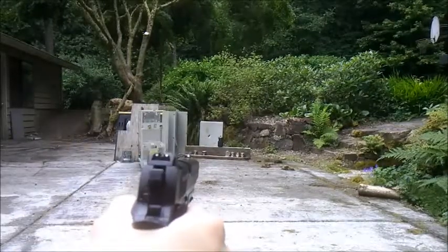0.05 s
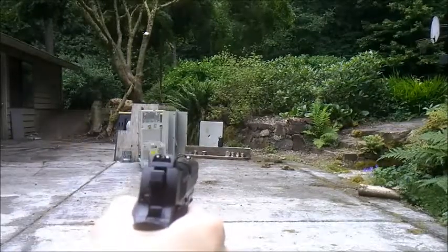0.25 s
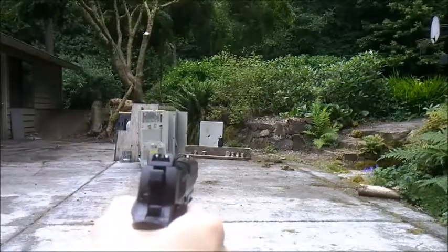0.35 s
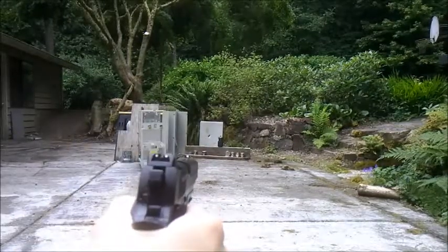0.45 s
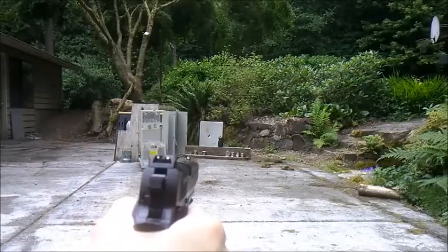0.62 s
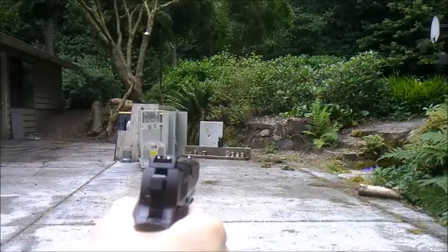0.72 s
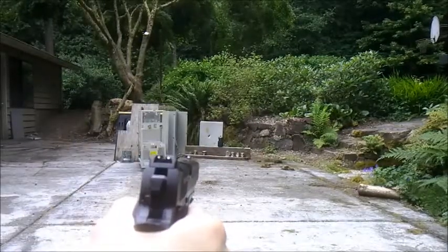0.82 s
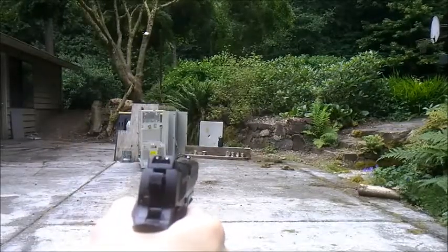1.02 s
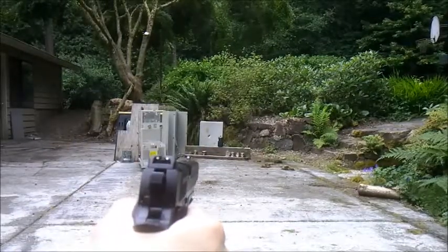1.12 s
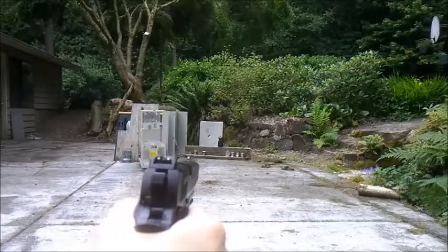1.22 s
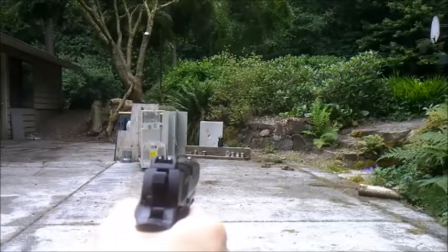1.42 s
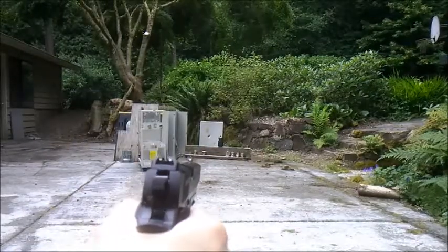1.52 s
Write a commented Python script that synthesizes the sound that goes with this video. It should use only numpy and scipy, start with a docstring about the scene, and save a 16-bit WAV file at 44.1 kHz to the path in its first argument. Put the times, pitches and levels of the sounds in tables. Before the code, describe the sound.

A gas air pistol fires twice about a second apart, close to the microphone, in a concrete yard; each hissy pop is followed by a metallic pellet hit, brief echo and trigger clicks.

```python
"""A gas air pistol fires twice on a concrete yard, over a low wavering hum, soft outdoor noise and faint blips.
Each shot: a hammer tick, a gas blast of decaying noise that overloads the microphones, with a ringing frame,
a recoil thump of low tones, then the pellet cracking on a sheet-metal box and ringing its modes.
The yard answers with dense echoes made from fading noise. After each shot the trigger clicks back:
short noise scrapes with a snap, sent through resonances."""
import sys
import numpy as np
from scipy import signal
from scipy.fft import rfft, irfft
from scipy.io import wavfile
from scipy.ndimage import uniform_filter1d

SR = 44100
rng = np.random.default_rng(int(sys.argv[2]) if len(sys.argv) > 2 else 0)


def put_to_file(sound):
    """Save the sound as 16-bit audio at rate SR, in the file named by the first command-line argument."""
    columns = np.atleast_2d(sound).T  # one column per channel
    safe = np.clip(columns, -1, 1)
    whole_steps = np.round(safe * 32767)
    wavfile.write(sys.argv[1], SR, whole_steps.astype(np.int16))


def amplitude_ratio(level_db):
    """Convert a level in decibels to the matching linear amplitude (field) ratio."""
    exponent = np.asarray(level_db, float) / 20
    return 10 ** exponent


N = 68355  # length in samples


def curve(table, at, col=1, log=False):
    """Draws straight lines between table rows, on a log scale of the first column if asked."""
    rows = np.array(table, float)
    warp = np.log if log else np.asarray
    return np.interp(warp(at), warp(rows[:, 0]), rows[:, col])


def colour(x, table, scale=1):
    """Filters causally with the gain of (Hz, dB) points: a minimum-phase filter built from its log gain."""
    hz = np.maximum(np.arange(2049) * SR / 4096, 1)
    log_gain = scale * curve(table, hz, log=True) * np.log(10) / 20
    cepstrum = irfft(log_gain)
    # folding the second half onto the first makes the filter causal
    cepstrum[1:2048] *= 2
    cepstrum[2049:] = 0
    response = irfft(np.exp(rfft(cepstrum)))[None, :2048]
    return signal.fftconvolve(x, response, axes=1)[:, :x.shape[1]]


def unit(x):
    """Scales a sound to an rms of 1."""
    return x / np.sqrt(np.mean(x ** 2))


def fade(t, t60):
    """Decays exponentially from t = 0, by 60 dB in t60 seconds; silent before."""
    return (t >= 0) * amplitude_ratio(-60 * np.maximum(t, 0) / max(t60, .001))


def band(x, hz, width):
    """Resonates around one frequency; width in Hz."""
    return signal.lfilter(*signal.iirpeak(min(hz, .45 * SR), hz / width, SR), x)


def walk(rate, channels=1, count=N):
    """Wanders slowly at random with spread 1: smoothed noise drawn every 32 samples, faster for a higher rate."""
    smoothing = int(SR / rate / 32) + 1
    points = count // 32 + 2
    draws = rng.standard_normal((channels, N // 32 + 2))
    smooth = unit(uniform_filter1d(uniform_filter1d(draws, smoothing), smoothing))
    return np.array([np.interp(np.arange(count) / 32, np.arange(points), row[:points]) for row in smooth])


def pair(count):
    """Makes left and right noise that is more alike in the bass: the difference is weakened below 1200 Hz."""
    mid, side = rng.standard_normal((2, count))
    side = signal.lfilter(*signal.butter(1, 1200, "high", fs=SR), side) + .15 * side
    return (mid + side * np.array([[1], [-1]]) / 1.2) / np.sqrt(2)


def mode(t, hz, t60, rough, apart):
    """Rings one fading tone whose phase and size wander; apart scatters the phase between the sides."""
    start = 2 * np.pi * rng.random() + apart * rng.standard_normal() * np.array([[0], [1]])
    wander = walk(110, channels=3, count=len(t))
    size = amplitude_ratio(3.2 * rough * wander[0])
    return fade(t, t60) * size * np.sin(2 * np.pi * hz * t + start + rough * wander[1:])


def slide_bursts(t):
    """Gives the swell of the blast, of the slide slamming back and of the slide closing, over a steady 1."""
    # Each row: delay in seconds, extra level in dB, hold in seconds, 60 dB decay in seconds.
    bursts = [(0, 4, .007, 0.01547), (0.0109, 2.5, .002, .03), (.025, -2, .002, .03)]
    swell = 1
    for lag, db, hold, t60 in bursts:
        swell = swell + amplitude_ratio(db) * (t >= lag) * fade(np.maximum(t - lag - hold, 0), t60)
    return swell


def gas_blast(gas, t):
    """Lets the gas noise die at its own speed in each half-octave band, with patchy loudness."""
    # How fast the blast dies. Each row: frequency in Hz, 60 dB decay in seconds.
    decays = [(150, 0.42), (600, 0.19), (2000, 0.15), (4000, .22), (8000, 0.32), (14000, 0.24)]
    hold_s, patchy_db = 0.0043, 3.5
    blast = 0
    for hz in 110 * 2 ** np.arange(0, 7.3, .5):
        t60 = curve(decays, hz, log=True)
        envelope = (t >= 0) * fade(np.maximum(t - hold_s, 0), t60)
        patches = amplitude_ratio(patchy_db * walk(120, count=len(t)))
        blast = blast + band(gas, hz, hz / 3) * envelope * patches
    return blast


def hammer_tick(gas, t):
    """Ticks just ahead of the blast: a short burst of the same noise with a 1 ms rise."""
    lead_s, t60_s = 0.0037, 0.011
    u = t + lead_s
    return gas * fade(u, t60_s) * np.clip(u / .001, 0, 1)


def frame_ring(t):
    """Rings the metal modes of the pistol frame as rough fading tones."""
    # Modes of the frame. Each row: frequency in Hz, level in dB against the shot, 60 dB decay in seconds.
    frame = [(600, -4.5, .08), (1119, -14, 0.18), (1524, -9.5, 0.075), (3030, -5, 0.25), (3180, -2, 0.16),
             (3780, 2.5, .16), (4000, -5.5, 0.15), (4760, -12.5, .2), (5090, -16, .13), (6740, -10, 0.14),
             (7200, -25, 0.17), (9100, -14, 0.48), (11100, -25.5, 0.65)]
    return sum(amplitude_ratio(db) * mode(t, hz, t60, rough=1.1, apart=hz / 3000) for hz, db, t60 in frame)


def recoil_thump(t):
    """Thumps with one low fading tone in each side, rising over 6 ms."""
    # First row left, second right. Each row: frequency in Hz, level in dB against the thump's own,
    # 60 dB decay in seconds, delay in seconds.
    thump = [(56, 0.5, 0.14, 0.0022), (75, -11.5, 0.033, 0.006)]
    sides = []
    for hz, db, t60, lag in thump:
        u = t - lag
        sides.append(amplitude_ratio(db) * fade(u, t60) * np.sin(2 * np.pi * hz * u) * np.clip(u / .006, 0, 1))
    return np.array(sides)


def muzzle_puff(t):
    """Swings the pressure at the muzzle: a quickly dying low tone, starting downward."""
    hz, db = 208, -15.5
    return -amplitude_ratio(db) * fade(t, .02) * np.sin(2 * np.pi * hz * t)


def shot(t, db, tick_db, thump_db):
    """Fires once: returns the gas noise with its tick, the ringing frame, and the low thump with its puff."""
    # Colour of the gas noise. Each row: frequency in Hz, relative level in dB.
    gas_colour = [(59, -31.5), (100, -7), (224, -12), (752, -5.5), (1280, -14), (1550, -5), (2170, -10),
                  (2520, -11.5), (3860, -3.5), (6290, -10), (9210, -16), (16000, -30.5)]
    gas = unit(colour(pair(len(t)), gas_colour))
    level = amplitude_ratio(db) * slide_bursts(t)
    blast = level * gas_blast(gas, t) + amplitude_ratio(tick_db) * hammer_tick(gas, t)
    low = amplitude_ratio(thump_db) * recoil_thump(t) + muzzle_puff(t)
    return blast, level * frame_ring(t), low


def hit(t, db, crack_db, side, longer):
    """Cracks the pellet on the sheet-metal box as fading noise and rings the modes of the box."""
    # Colour of the crack. Each row: frequency in Hz, relative level in dB.
    crack_colour = [(500, -33), (1500, -9.5), (3000, 5.5), (7000, 1), (12000, -1.5), (16000, -7.5)]
    # Modes of the box. Each row: frequency in Hz, level in dB when struck at side 0, level in dB at side 1,
    # 60 dB decay in seconds before the hit's length factor, left minus right in dB.
    box = [(760, -26, -22, .15, 3), (1150, -14.5, -24, 0.12, 4.5), (1760, -5, -5.5, 0.12, -6),
           (1996, -3, -35, 0.063, -3.5), (2252, -0.5, -27, 0.1, -6.5), (2480, -0.5, -33, .06, 2.5),
           (2900, 1, -16, 0.034, -1), (4676, 6.5, -5, .07, -5.5), (5500, -22.5, -13, 0.062, -11.5),
           (7250, -12, -16, 0.24, 0.5), (8970, -3.5, -26, 0.048, -3), (11210, -15, -28, 0.25, 9.5),
           (12100, -13, -15.5, .18, 2.5), (14300, -16.5, -17.5, .12, 3.5)]
    crack = unit(colour(pair(len(t)), crack_colour)) * fade(t, .13)
    crack = crack * amplitude_ratio(crack_db + 2.5 * walk(150, count=len(t)))
    ring = 0
    for hz, db_0, db_1, t60, pan in box:
        level = db_0 + side * (db_1 - db_0) + np.array([[pan], [-pan]]) / 2
        rough = min(0.6 + hz / 9000, 1.1)
        ring = ring + amplitude_ratio(level) * mode(t, hz, longer * t60, rough=rough, apart=hz / 1500)
    return crack, amplitude_ratio(db) * ring


def trigger_clicks(t):
    """Rings the plastic trigger with short noise scrapes, each with a snap partway through."""
    # The clicks. Each row: start in seconds, level in dB, brightness in dB, scrape length in seconds.
    click_rows = [(0.489, -43, 9.5, .005), (0.5181, -22.5, 0.5, 0.0025), (0.529, -34.5, 6.5, .0015),
                  (1.4741, -41.5, 3, .006), (1.4872, -43, 8, 0.001), (1.5096, -26, 0.5, 0.0023),
                  (1.52, -34, 2, 0.0019)]
    # Resonances of the trigger. Each row: frequency in Hz, width in Hz,
    # level in dB before a correction for the width.
    resonances = [(692, 290, -8.5), (1125, 270, 2), (2177, 170, 0.5), (3116, 200, 7.5), (4200, 500, -3),
                  (5600, 490, 7), (7500, 640, -8), (8600, 500, -14), (11700, 500, -23), (14200, 500, -14)]
    out = np.zeros((2, N))
    for start, db, bright_db, length in click_rows:
        i = int(start * SR)
        u = t[i:i + 2000] - start
        scrape = pair(len(u)) * fade(np.maximum(u - length, 0), .012) * (u >= 0)
        snap = 5.37 * amplitude_ratio(-bright_db) * fade(u - 0.46 * length, .0003)
        push = 0.99 * scrape + snap
        body = 0
        for k, (hz, width, mode_db) in enumerate(resonances):
            gain = (-1) ** k * amplitude_ratio(mode_db) * np.sqrt(1000 / width)  # neighbours have opposite signs
            body = body + gain * band(band(push, hz, width), hz, 3 * width)
        hiss = amplitude_ratio(bright_db - 8.5) * band(scrape, 6700, 21000)
        both = body * amplitude_ratio(-bright_db) + hiss
        out[:, i:i + len(u)] += amplitude_ratio(db) * signal.lfilter(*signal.butter(3, 520, "high", fs=SR), both)
    return out


def yard(x):
    """Answers with dense echoes from walls and bushes: fading noise as the response, the treble dying sooner."""
    # Colour of the echo. Each row: frequency in Hz, relative level in dB.
    echo_colour = [(200, -28), (800, -15), (2000, -8.5), (3000, -7.5), (4500, -7), (6500, -3.5), (9000, -2),
                   (12000, -0.5), (15000, -2.5)]
    t60_s, treble_t60_s, level_db = .75, .5, -18
    t = np.arange(int(.7 * SR)) / SR
    noise = unit(colour(pair(len(t)), echo_colour))
    low = signal.lfilter(*signal.butter(2, 5000, fs=SR), noise)
    echo = low * fade(t, t60_s) + (noise - low) * fade(t, treble_t60_s)
    echo = echo * np.clip(t / .03, 0, 1)  # the echoes build up over 30 ms
    return amplitude_ratio(level_db) * signal.fftconvolve(x, echo / np.sqrt(.02 * SR), axes=1)[:, :x.shape[1]]


def low_hum(t):
    """Hums on a low tone with wavering pitch, plus its octave at a wandering level."""
    # Loudness of the hum. Each row: time in seconds, rms level of the low tone in dB.
    hum_db = [(0, -46), (.06, -45), (.11, -57), (.14, -47), (.3, -45.5), (.5, -46), (.54, -53.5),
              (.58, -52.5), (.67, -44.5), (.71, -61), (.78, -66), (.85, -54), (.97, -65), (1.02, -55.5),
              (1.2, -67), (1.37, -56), (1.41, -60.5), (1.55, -54)]
    hz, waver = 70.8, 0.03  # waver is a share of the pitch
    phase = 2 * np.pi * np.cumsum(hz * (1 + waver * walk(14)[0])) / SR
    octave = amplitude_ratio(-18.5 + 2.6 * walk(15)) * np.sin(2 * phase)
    return np.sqrt(2) * amplitude_ratio(curve(hum_db, t)) * (np.sin(phase) + octave)


def outdoor_noise(t):
    """Spreads soft noise whose half-octave bands flicker; the sides grow alike below 420 Hz."""
    # Colour of the noise. Each row: frequency in Hz, relative level in dB per Hz.
    noise_colour = [(25, -24.5), (50, -12.5), (75, -7), (100, -17.5), (150, -15), (290, -23.5),
                    (400, -32.5), (800, -27.5), (1300, -36), (2200, -38.5), (6000, -47.5), (16000, -59)]
    # Loudness of the noise. Each row: time in seconds, level in dB.
    noise_db = [(0, -54), (.2, -54), (.4, -53.5), (.6, -54), (.67, -52.5), (.7, -62.5), (.95, -64.5),
                (1.2, -66), (1.4, -62), (1.55, -56)]
    noise = 0
    for hz in 30 * 2 ** np.arange(0, 9.2, .5):
        mid, side = band(rng.standard_normal((2, N)), hz, hz / 3)
        stereo = mid + min(hz / 420, 1) * side * np.array([[1], [-1]])
        noise = noise + amplitude_ratio(2.0 * walk(27)) * stereo
    return unit(colour(noise, noise_colour)) * amplitude_ratio(curve(noise_db, t))


def yard_blips(t):
    """Adds faint short blips in the yard: narrow noise under a bell-shaped swell."""
    # The blips. Each row: middle in seconds, frequency in Hz, level in dB, length in seconds.
    blip_rows = [(0.141, 614, -62, 0.0098), (0.554, 995, -48, 0.0048), (.642, 840, -52, .012),
                 (0.649, 196, -47, 0.018), (0.671, 5500, -61, 0.012), (0.744, 980, -60.5, .02),
                 (.92, 2090, -77.5, .03), (1.101, 760, -61.5, 0.016)]
    out = 0
    for middle, hz, db, length in blip_rows:
        swell = np.exp(-2 * ((t - middle) / length * 2) ** 2)
        tone = unit(band(band(pair(N), hz, hz / 5), hz, hz / 3))
        out = out + np.sqrt(2) * amplitude_ratio(db) * swell * tone
    return out


def scene():
    """Places each shot with its hit and echo, then adds the clicks, hum, outdoor noise and blips."""
    # The shots. Each row: start in seconds, level of blast and frame in dB, hammer tick in dB, thump in dB.
    shots = [(0.2281, -13.5, -15, -9), (1.256, -18.5, -20.5, -11)]
    # The pellet hits. Each row: start in seconds, level of the ring in dB, crack in dB,
    # side of the box struck from 0 to 1, factor on the ring's length.
    hits = [(0.3197, -17.5, -20, 0.03, 0.83), (1.3496, -21, -28.5, 0.96, 1.1)]
    # Balance of the pistol, box and echo sounds. Each row: frequency in Hz, left minus right in dB.
    balance = [(100, 0), (200, 0.5), (380, 0.5), (700, -3), (1300, -0.5), (2400, 0), (4400, 0.5), (6000, 3),
               (8100, 12), (11000, 16), (15000, 21.5)]
    shot_s, tail_s, tail_cut_db = .7, 0.39, -10.5  # each shot is followed for shot_s
    t, low_sounds, near = np.arange(N) / SR, np.zeros((2, N)), np.zeros((2, N))
    for (shot_at, *shot_levels), (hit_at, *hit_settings) in zip(shots, hits):
        part = slice(int((shot_at - .01) * SR), int((shot_at + shot_s) * SR))
        u = t[part]
        blast, frame, low = shot(u - shot_at, *shot_levels)
        crack, box = hit(u - hit_at, *hit_settings)
        echo = yard(blast + crack + amplitude_ratio(-13) * (frame + box))
        # the tail drops in level within 50 ms
        tail = amplitude_ratio(tail_cut_db * np.clip((u - shot_at - tail_s) / 0.05, 0, 1))
        near[:, part] += (blast + crack + frame + box + echo) * tail
        low_sounds[:, part] += low
    click = trigger_clicks(t)
    near = near + click + amplitude_ratio(-6) * yard(click)
    left = colour(near[:1], balance, scale=.5)[0]
    right = colour(near[1:], balance, scale=-.5)[0]
    return np.array([left, right]) + low_sounds + low_hum(t) + outdoor_noise(t) + yard_blips(t)


def top_cut(x):
    """Nothing passes above the cut-off."""
    return signal.sosfilt(signal.butter(12, 16850, fs=SR, output="sos"), x)


def record(dry):
    """Overloads the microphones so that the loudest peaks flatten, then cuts the top of the treble."""
    ceiling, knee, offset, top_hz = .72, 5, -.0005, 15900  # a higher knee bends more sharply
    flattened = dry / (1 + np.abs(dry / ceiling) ** knee) ** (1 / knee) + offset
    mix = signal.sosfilt(signal.ellip(10, .2, 80, top_hz, fs=SR, output="sos"), flattened)
    return top_cut(mix)


dry = scene()
out = record(dry)
put_to_file(out)
```